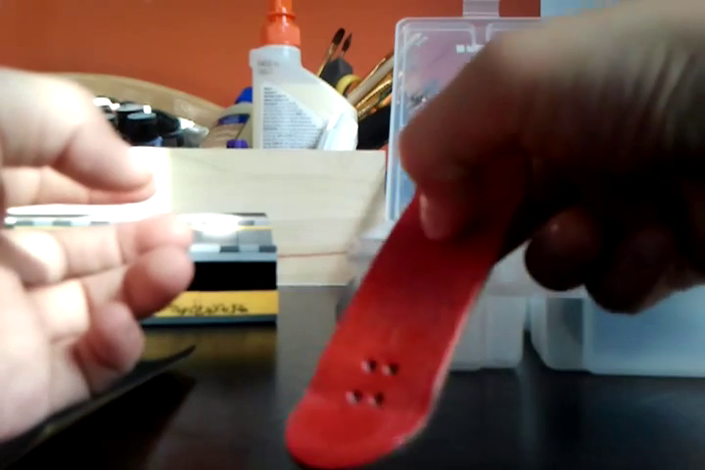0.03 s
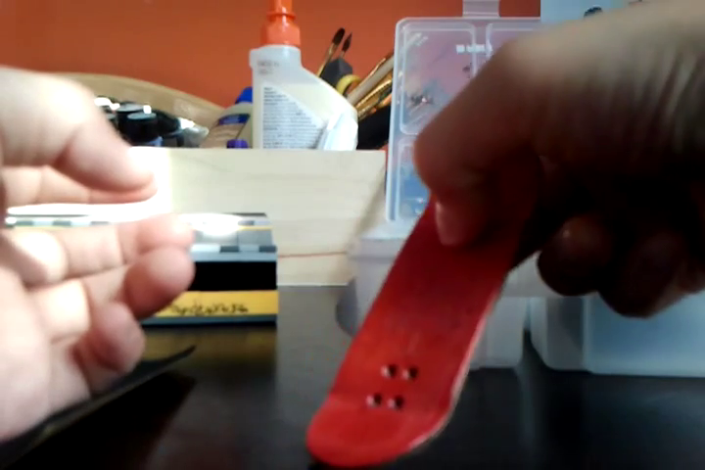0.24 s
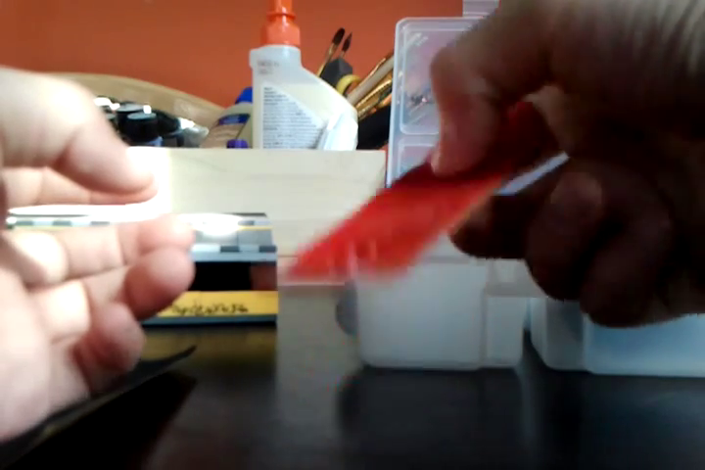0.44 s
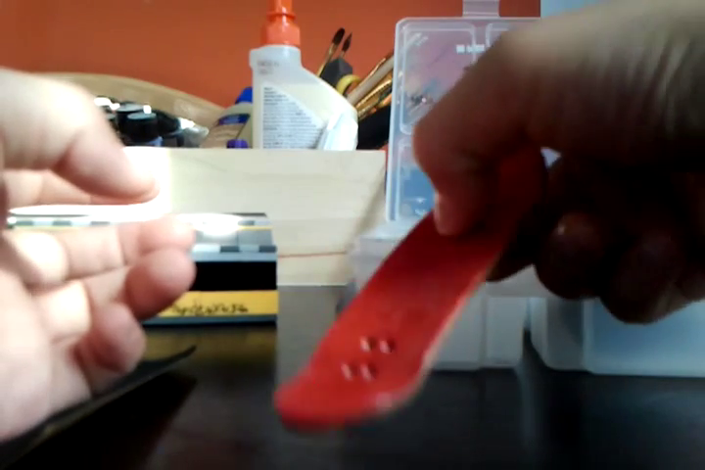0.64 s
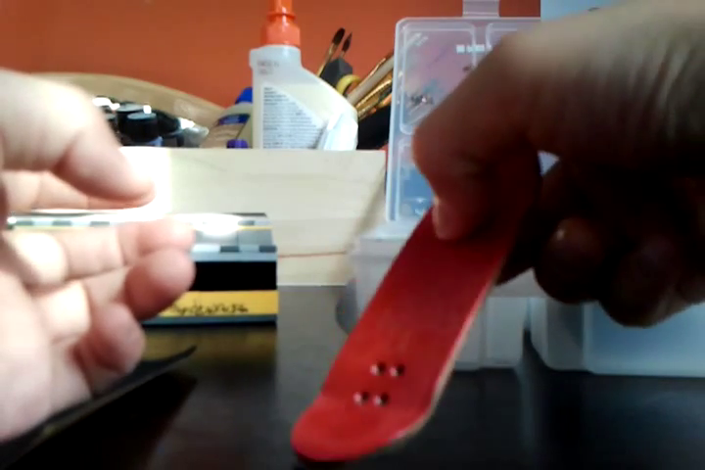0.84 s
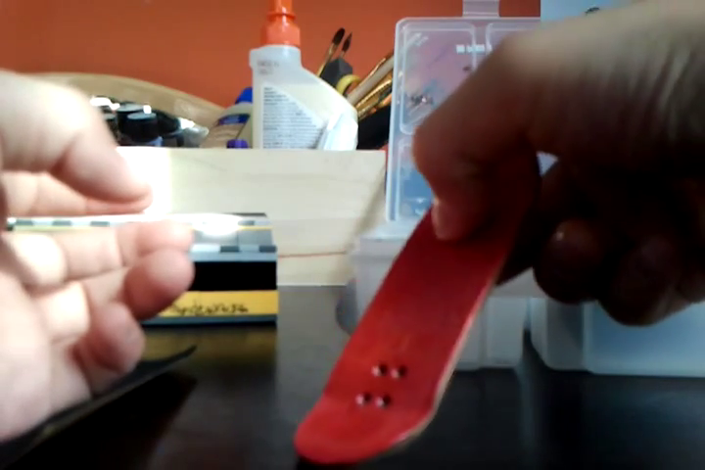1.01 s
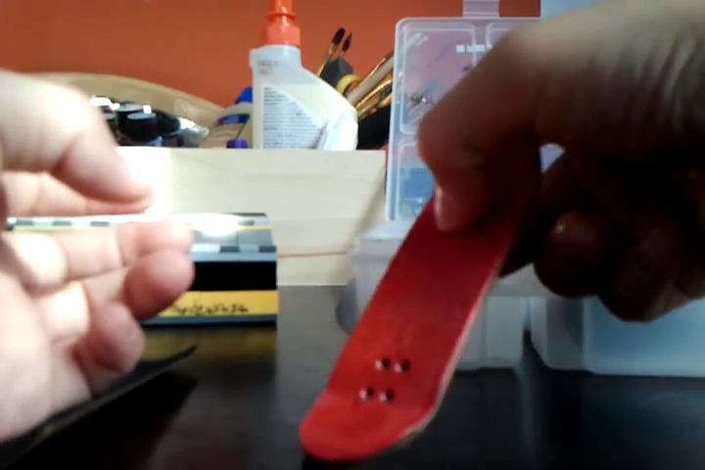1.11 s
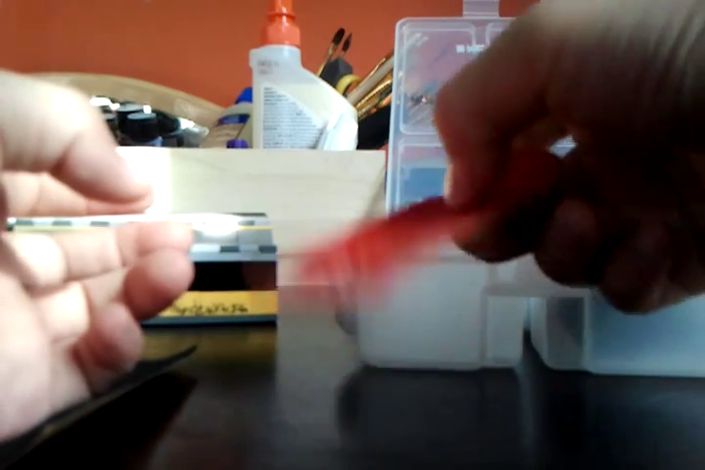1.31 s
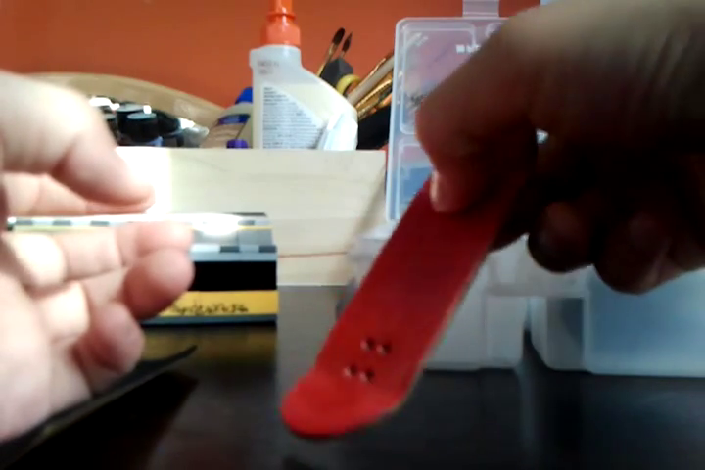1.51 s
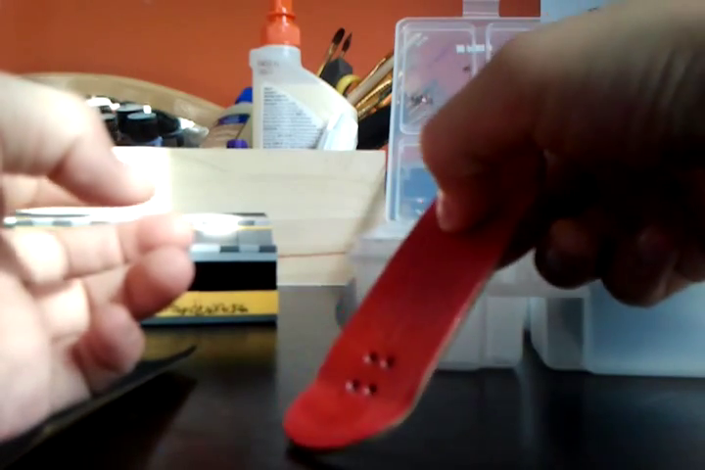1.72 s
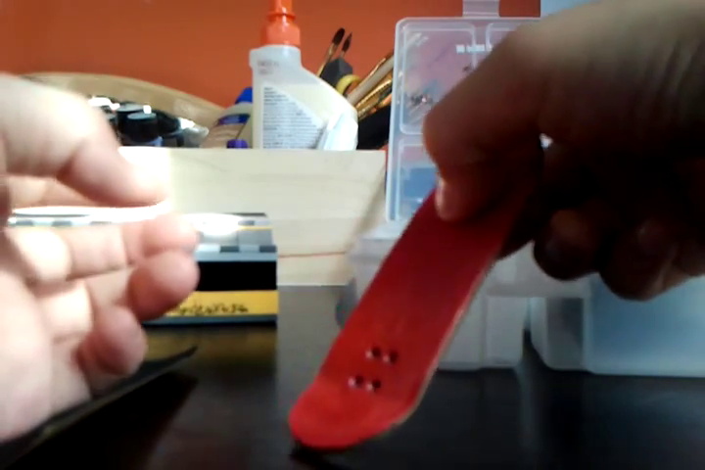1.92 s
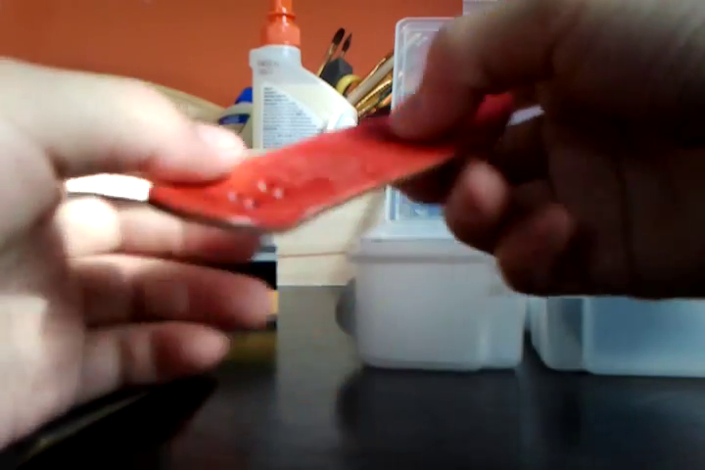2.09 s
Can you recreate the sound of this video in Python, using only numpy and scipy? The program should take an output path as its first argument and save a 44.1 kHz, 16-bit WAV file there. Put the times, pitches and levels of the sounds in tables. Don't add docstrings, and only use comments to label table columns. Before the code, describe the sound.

A small wooden toy deck clacks on a tabletop three times, each drop bouncing quickly to rest

```python
import sys
import numpy as np
from scipy import signal
from scipy.fft import rfft, irfft
from scipy.io import wavfile

SR = 44100
rng = np.random.default_rng(int(sys.argv[2]) if len(sys.argv) > 2 else 0)


def amplitude_ratio(level_db):
    exponent = np.asarray(level_db, float) / 20
    return 10 ** exponent


def wav_out(sig):
    wavfile.write(sys.argv[1], SR, np.round(np.clip(np.atleast_2d(sig).T, -1, 1) * 32767).astype(np.int16))


N = 94815


def read_spectrum(points, hz):
    point_hz, point_db = np.transpose(points)
    return np.interp(np.log(hz + 1), np.log(point_hz + 1), point_db)


def gain_over_time(points):
    point_s, point_db = np.transpose(points)
    return amplitude_ratio(np.interp(np.arange(N) / SR, point_s, point_db))


def shaped_noise(spectrum):
    hz = np.fft.rfftfreq(N, 1 / SR)
    inside = (hz > spectrum[0][0]) & (hz < spectrum[-1][0])
    shape = amplitude_ratio(read_spectrum(spectrum, hz)) * inside
    noise = irfft(rfft(rng.standard_normal(N)) * shape, N)
    return noise / np.sqrt(np.mean(noise ** 2) + 1e-20)


def recorder_hiss():
    # f/Hz, density/dB per Hz
    hiss_spectrum = [(88, -49), (150, -24), (169, -1), (304, -10), (380, -15), (840, -15.5), (981, -19),
                     (7240, -28.5), (9210, -41.5), (12000, -78), (20300, -120)]
    return amplitude_ratio(-54) * shaped_noise(hiss_spectrum)


def air_rumble():
    # f/Hz, density/dB per Hz
    rumble_spectrum = [(7.1, -22.5), (12, 12.5), (26, -8.5), (39, 3), (118, -12), (160, -19.5), (210, -62),
                       (350, -120)]
    # t/s, level/dB
    gust_levels = [(0, -45), (.2, -46), (.3, -46), (.55, -44), (.8, -47), (1.1, -45), (1.19, -36),
                   (1.3, -35), (1.4, -36), (1.48, -45), (1.6, -49), (1.75, -48), (1.9, -45), (2.15, -45)]
    return shaped_noise(rumble_spectrum) * gain_over_time(gust_levels)


def hand_rustle():
    # t/s, level/dB
    stir_levels = [
        (0, -48),
        (.12, -84),
        (.55, -59.5),
        (.7, -68),
        (.9, -57),
        (1.4, -60.5),
        (1.55, -103),
        (1.7, -55.5),
        (2.15, -58),
    ]
    centre_hz, width_hz = 710, 600
    band = [(centre_hz - width_hz / 2, -6), (centre_hz, 0), (centre_hz + width_hz / 2, -6)]
    return shaped_noise(band) * gain_over_time(stir_levels)


def mains_hum():
    # f/Hz, level/dB rms
    hum_lines = [(60, -58.5), (120, -67), (180, -61.5), (240, -89.5), (300, -63.5)]
    t = np.arange(N) / SR
    hum = np.zeros(N)
    for hz, db in hum_lines:
        hum += np.sqrt(2) * amplitude_ratio(db) * np.sin(2 * np.pi * (hz * t + rng.random()))
    return hum


def struck_modes(t, hz, decay, db, rise_s):
    sign = (-1.) ** np.arange(len(hz))
    sines = np.sin(2 * np.pi * hz * t[:, None])
    dying = sign * amplitude_ratio(db) * np.exp(-decay * t[:, None]) * sines
    return dying.sum(1) * (1 - np.exp(-t / rise_s)) ** 2


def decay_of(t60):
    return np.log(1000) / t60


def deck_click(t, deck, db):
    hz, width, mode_db = np.transpose(deck)
    dulling, thinning = .15, .12
    mode_db = mode_db + 20 * np.log10(width / 300)
    mode_db = mode_db + db * (dulling * (hz > 6500) + thinning * (hz < 4800))
    click = struck_modes(t, hz, np.pi * width, mode_db, 0.0009)
    return click / abs(click).max()


def table_knock(t):
    # f/Hz, t60/s, level/dB
    table_modes = [(111, 0.035, -13.5), (283.7, 0.057, -12), (467, 0.018, -5), (600, 0.021, 1),
                   (744.6, 0.039, -5.5), (930, 0.01, 6.5), (1153, 0.013, -7), (1510, 0.0084, -12),
                   (1788, 0.022, -2), (2227, 0.013, 5)]
    hz, t60, mode_db = np.transpose(table_modes)
    knock = struck_modes(t, hz, decay_of(t60), mode_db, 0.00039)
    return knock / abs(knock).max()


def room_tick(t):
    impulse = np.arange(len(t)) == 0
    return impulse + struck_modes(t, np.array([5040.]), decay_of(.035), [-30], 1e-4)


def deck_ring(t):
    # f/Hz, t60/s, level/dB
    ring_modes = [
        (5005, .15, -34),
        (5080, .14, -35),
        (5060, .025, -16),
    ]
    hz, t60, mode_db = np.transpose(ring_modes)
    return struck_modes(t, hz, decay_of(t60), mode_db, 0.0012)


def bounce(t, deck, db, knock_db):
    wet_slope, ring_slope = .9, .8
    return [amplitude_ratio(db - 2.5) * deck_click(t, deck, db),
            amplitude_ratio(db + knock_db + 4.5) * table_knock(t),
            amplitude_ratio(wet_slope * db) * room_tick(t),
            amplitude_ratio(ring_slope * db) * deck_ring(t)]


def near_echoes(length):
    # delay/s, click level/dB, knock level/dB
    arrivals = [(0, -6.5, -2), (.0006, 3, -0.5), (.0019, -15.5, -9.5), (.0037, -15, -4.5),
                (.0047, -9.5, -10.5), (.0061, -19, -1), (.0092, -23.5, -4.5), (.0132, -17.5, -7.5),
                (.0172, -34, -3), (.0202, -26.5, -11.5), (.031, -39, -17), (.036, -31, -9)]
    delay_s, click_db, knock_db = np.transpose(arrivals)
    taps = np.arange(length)[:, None] == np.round(delay_s * SR)
    taps = taps * (-1.) ** np.arange(len(delay_s))
    return [taps @ amplitude_ratio(click_db), taps @ amplitude_ratio(knock_db)]


def room_tail():
    # f/Hz, t60/s
    room_decay = [(200, 0.95), (600, 0.27), (1500, 0.31), (3700, 0.14), (5500, 0.28), (8000, 0.2)]
    # f/Hz, level/dB
    room_colour = [(150, -35), (400, -4), (800, -9), (1400, -8), (2300, -6), (3500, 0.5), (5200, -9),
                   (7000, -10.5), (9300, -24.5)]
    late_db, late_stretch, start_s = -23, 1.4, 0.0014
    length = SR // 2
    taps = np.zeros(length)
    at = np.arange(0, length - 8, 8)
    taps[at + rng.integers(0, 8, len(at))] = rng.choice([-1., 1.], len(at))
    hz, t, bands = signal.stft(taps, SR, nperseg=256)
    fall_db = -60 * t / read_spectrum(room_decay, hz)[:, None]
    fall = amplitude_ratio(fall_db) + amplitude_ratio(late_db + fall_db / late_stretch)
    bands = bands * amplitude_ratio(read_spectrum(room_colour, hz))[:, None] * fall
    tail = signal.istft(bands, SR, nperseg=256)[1][:length]
    tail = tail * np.minimum(np.arange(len(tail)) / SR / start_s, 1) ** 2
    return amplitude_ratio(0.5) * tail / np.linalg.norm(tail)


def drop(bounces, deck):
    lead, length = SR // 10, 9000
    parts = np.zeros((4, N + SR))
    for s, db, knock_db in bounces:
        at = int(np.ceil(s * SR))
        t = (np.arange(length) + at - s * SR) / SR
        parts[:, lead + at:lead + at + length] += bounce(t, deck, db, knock_db)
    tail = room_tail()
    answers = near_echoes(len(tail)) + [tail]
    heard = signal.fftconvolve(parts[:3], answers, axes=1).sum(0)[:N + SR]
    return (heard + parts[3])[lead:lead + N]


def scene():
    # t/s, click peak level/dB, table knock level/dB
    earlier_bounce = (-.045, -16, -9.5)
    first_drop = [(.2465, 4.5, -22.5), (.3318, -5, -23), (.3938, -12.5, -20.5), (.4456, -16.5, -20.5),
                  (.474, -22.5, -17.5), (.4941, -28, -13.5), (.5083, -36, -24), (.5185, -37, -8),
                  (.5258, -50, -12), (.5361, -43, -18), (.542, -51.5, 1)]
    second_drop = [
        (.9348, -0.5, -23),
        (1.051, -6.5, -21),
        (1.1376, -12.5, -21),
        (1.2039, -18, -20.5),
        (1.256, -24, -18),
        (1.285, -30, -14),
        (1.3039, -33.5, -13.5),
        (1.318, -40.5, -29),
        (1.3303, -42.5, -8),
    ]
    third_drop = [
        (1.725, -0.5, -23),
        (1.8713, -11, -21),
        (1.9665, -12.5, -21),
        (2.0259, -16, -21.5),
        (2.0589, -23, -18),
        (2.0814, -32, -11.5),
        (2.0973, -34.5, -22),
        (2.1097, -34.5, -12),
        (2.1185, -52, -22),
        (2.129, -55, -14),
    ]
    # f/Hz, width/Hz, level/dB
    first_grip = [(1730, 130, -15), (2280, 1000, -15.5), (3120, 360, -17), (3480, 480, -8),
                  (3966, 250, -3.5), (4580, 280, -3.5), (5377, 470, 5.5), (6080, 380, -11.5),
                  (6825, 270, -8), (7560, 300, -25.5), (8190, 490, -13), (9300, 225, -25)]
    second_grip = [(1310, 240, -26), (1874, 380, -7), (2380, 130, -18.5), (2840, 670, -10),
                   (3620, 400, -10.5), (4026, 220, -2.5), (4930, 900, -41), (5278, 850, 9.5),
                   (6730, 530, -3), (7790, 120, -16), (8230, 130, -14), (9140, 490, -20)]
    third_grip = [(1510, 360, -8), (1820, 1100, -11), (2200, 500, -6), (3006, 123, -12), (3630, 130, -18),
                  (4194, 620, -1), (5080, 130, 1), (5258, 860, 5.5), (6770, 750, -4.5), (7530, 260, -21.5),
                  (8160, 730, -10), (9347, 240, -27.5)]
    background = recorder_hiss() + air_rumble() + hand_rustle() + mains_hum()
    drops = drop([earlier_bounce], third_grip) + drop(first_drop, first_grip)
    drops = drops + drop(second_drop, second_grip) + drop(third_drop, third_grip)
    return (drops + background)[None]


def low_pass(x):
    return signal.sosfilt(signal.butter(12, 9360, fs=SR, output="sos"), x)


def record(dry):
    preamp_limit, edge_hz, ceiling = 1.13, 10680, 1.15
    soft = preamp_limit * np.tanh(dry / preamp_limit)
    band_limit = signal.cheby2(12, 70, edge_hz, fs=SR, output="sos")
    narrow = signal.sosfilt(band_limit, soft)
    mix = np.clip(narrow - .002, -ceiling, ceiling)
    return low_pass(mix)


dry = scene()
out = record(dry)
wav_out(out)
```